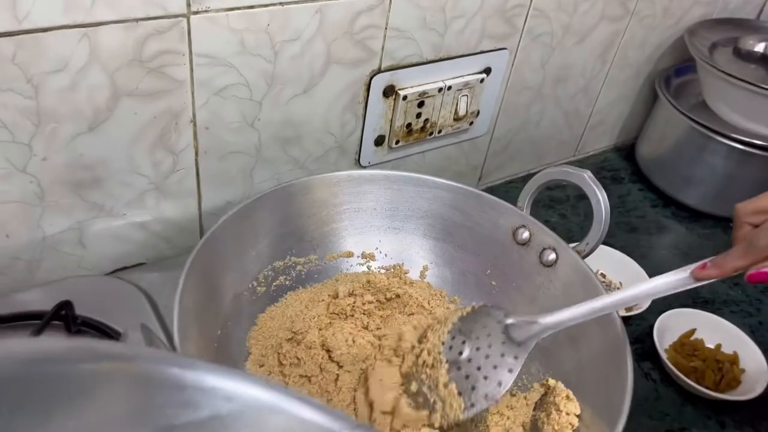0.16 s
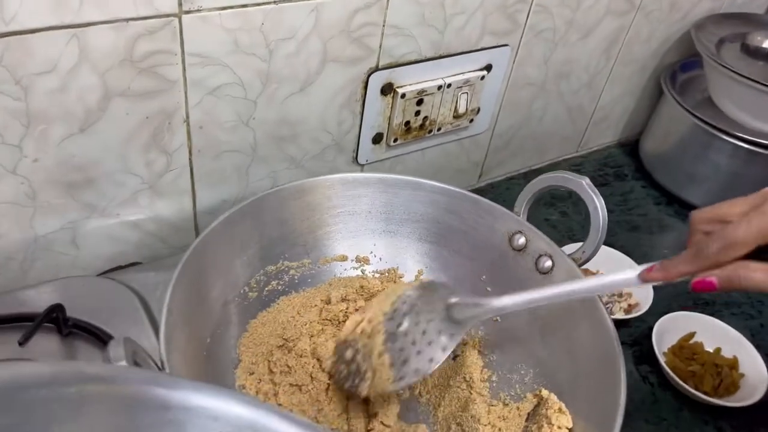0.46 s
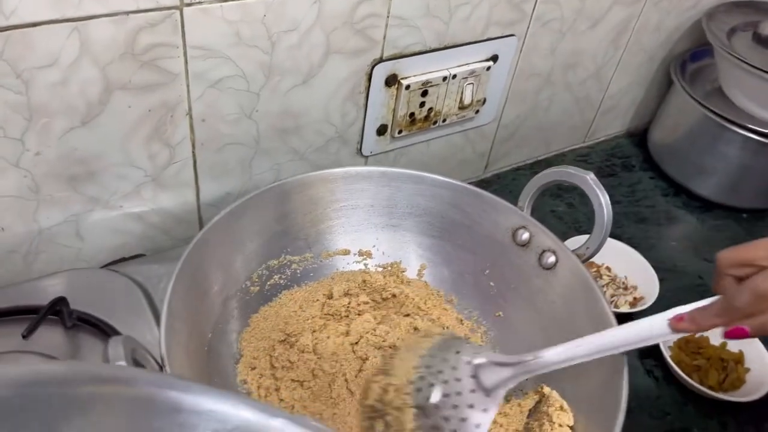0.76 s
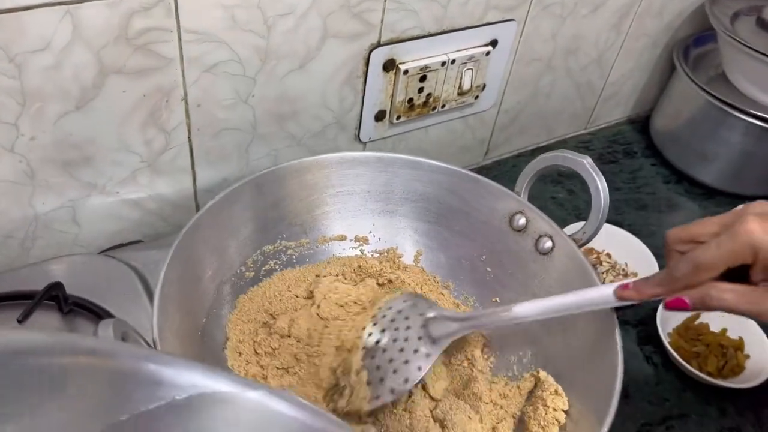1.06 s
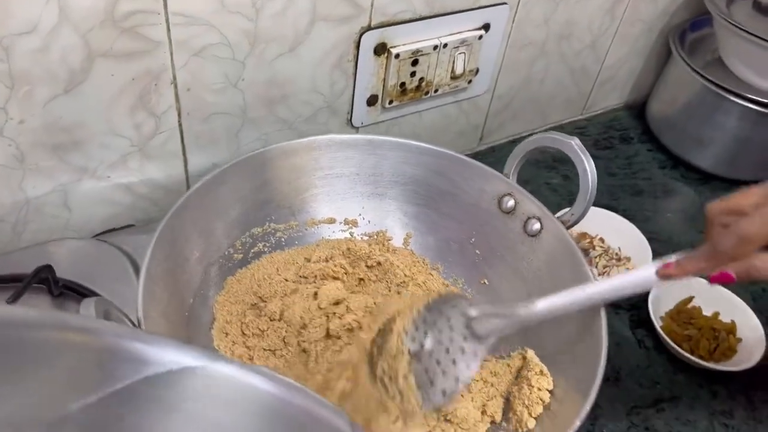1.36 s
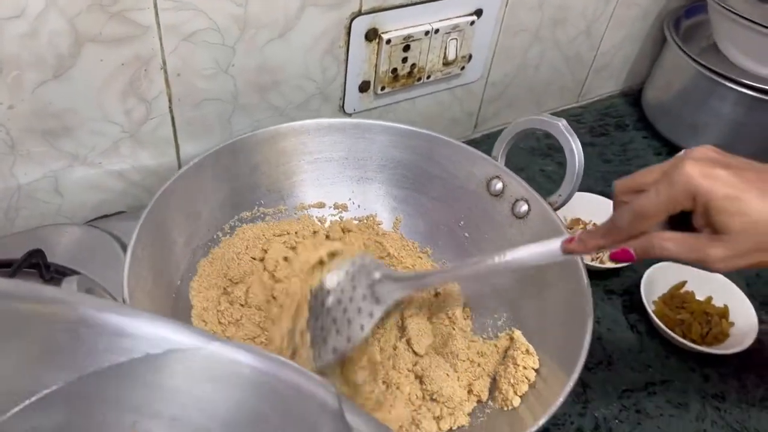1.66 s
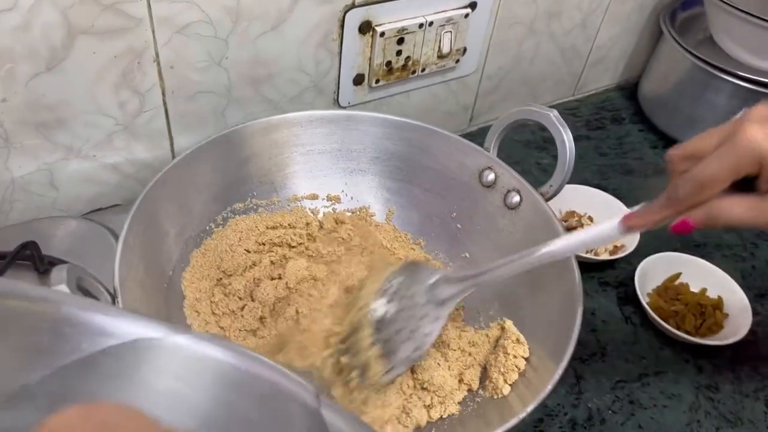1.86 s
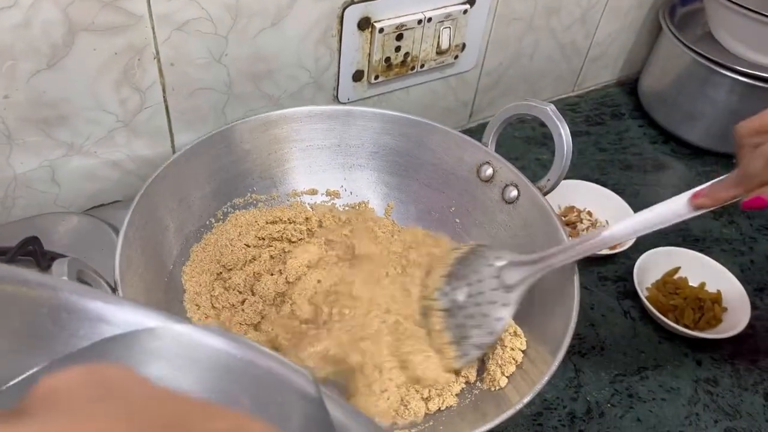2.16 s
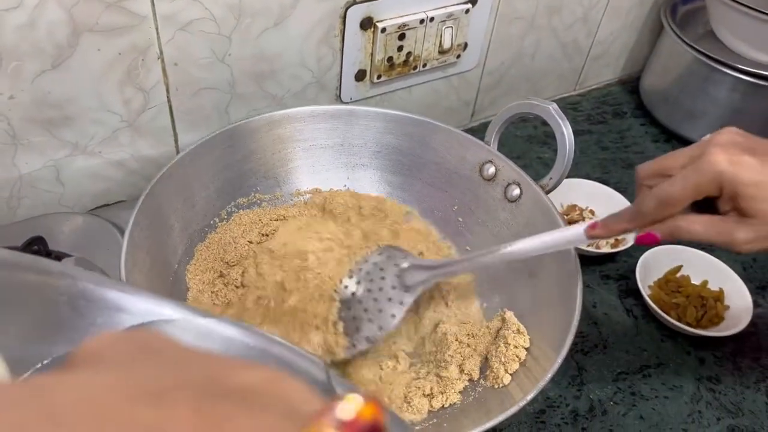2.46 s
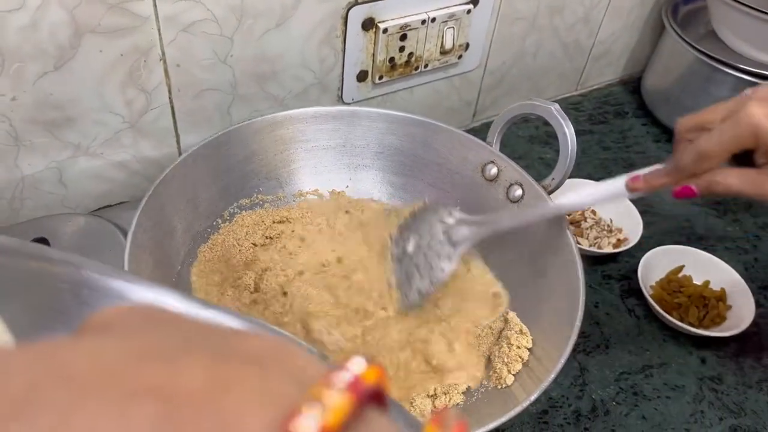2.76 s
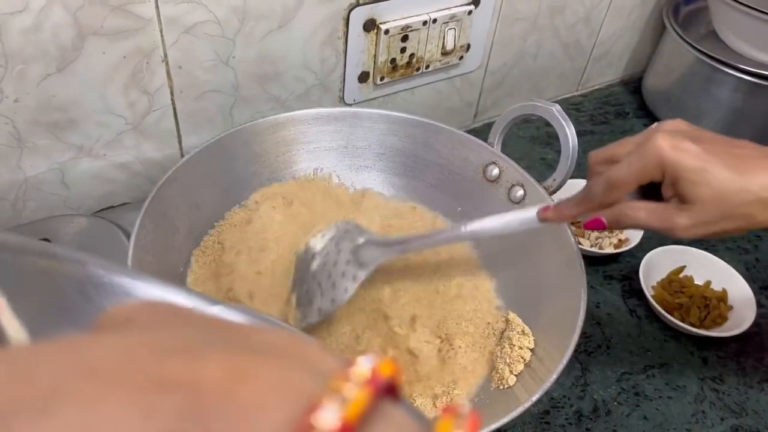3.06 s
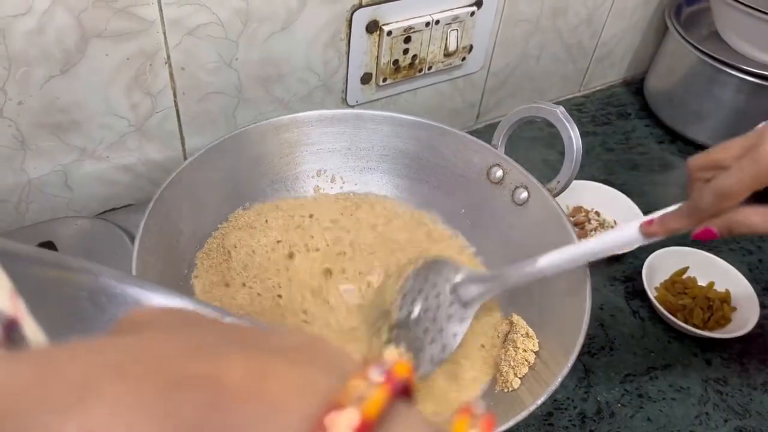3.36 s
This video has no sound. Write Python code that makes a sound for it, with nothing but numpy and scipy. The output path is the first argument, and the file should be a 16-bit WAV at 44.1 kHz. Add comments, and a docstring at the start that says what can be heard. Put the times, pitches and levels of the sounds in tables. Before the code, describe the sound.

Hissing, crackling sizzle of water poured onto hot roasted grain, with soft stirring plops.

```python
"""A tiled kitchen corner, one mono microphone close to a metal wok of roasted semolina and fat.
Hot water is poured in: the first splash flashes into a hiss of tiny bursts, then the full stream boils
with a deeper crackle, which turns hollow and dies down as the grain soaks. A slotted spoon stirs the
paste, which plops as steam escapes. Behind the wok the room hums faintly."""
import sys
import numpy as np
from scipy import signal
from scipy.fft import rfft, irfft
from scipy.io import wavfile
from scipy.ndimage import map_coordinates

SR = 44100
rng = np.random.default_rng(int(sys.argv[2]) if len(sys.argv) > 2 else 0)


def to_wav(sig):
    """Store sig (one row per channel, or 1-D mono) as 16-bit WAV at the path in sys.argv[1].

    Samples outside -1..1 are clipped; the rate is SR.
    """
    pcm = np.clip(np.atleast_2d(sig), -1, 1) * 32767
    pcm = np.round(pcm).astype(np.int16)
    wavfile.write(sys.argv[1], SR, pcm.T)  # frames by channels


N = 154350
T = np.arange(N) / SR
HZ = np.maximum(np.arange(N // 2 + 1) * SR / N, 1)
TOP_HZ = 15600


def undb(db):
    """Decibels to gain."""
    return 10 ** (np.asarray(db) / 20)

def unit(x):
    """Scale to rms 1."""
    return x / np.std(x)

def curve(rows):
    """Gain over time from rows of time_s, level_db."""
    time_s, level_db = np.array(rows).T
    return undb(np.interp(T, time_s, level_db))

def swell(peak_s, spread_s):
    """Bell-shaped rise and fall."""
    return np.exp(-.5 * ((T - peak_s) / spread_s) ** 2)

def shape(rows):
    """Gain per frequency from rows of frequency_hz, gain_db."""
    hz, db = np.array(rows).T
    return undb(np.interp(np.log(HZ), np.log(hz), db))

def peaks(rows, order=2):
    """Gain per frequency of resonances whose powers add."""
    return np.sqrt(sum(undb(db) ** 2 / (1 + ((HZ - hz ** 2 / HZ) / width) ** 2) ** order
                       for hz, width, db in rows))

def colour(x, gain):
    """Filter x and scale it to rms 1."""
    return unit(irfft(rfft(x) * gain, N))

def noise(gain):
    """Filtered noise at rms 1."""
    return colour(rng.standard_normal(N), gain)

def wander(rate_hz):
    """Smooth random drift at rms 1."""
    return noise(1 / (1 + (HZ / rate_hz) ** 4))

def tone(pitch_hz):
    """Sine at rms 1 that follows a moving pitch."""
    return np.sqrt(2) * np.sin(2 * np.pi * np.cumsum(pitch_hz) / SR)

def bursts(per_s, spread_db, steam_db, sputter_db, sputter_hz):
    """Tiny bubbles of random size burst over smooth steam; sputter makes the level waver."""
    size = undb(spread_db * np.minimum(rng.exponential(size=N), 5))
    pops = (rng.random(N) < per_s / SR) * size * rng.choice([-1, 1], N)
    steam = undb(steam_db) * rng.standard_normal(N)
    return (unit(pops) + steam) * undb(sputter_db * wander(sputter_hz))


# Colour of water flashing on hot metal: frequency_hz, gain_db
HISS_SPECTRUM = [(200, -39), (380, -34), (490, -18), (555, -16), (620, -11), (770, -6.5), (850, -27),
                 (940, -20), (1030, -7), (1200, -6), (1320, -9.5), (1850, -9.5), (2030, -1.5), (2300, 0),
                 (2600, -2.5), (3080, -1), (3400, -2.5), (4000, 1.5), (4450, 1), (5100, -3), (5950, -7),
                 (6600, -4), (7400, -8), (8100, -9.5), (8900, -8.5), (9600, -11), (10600, -22),
                 (12500, -34), (14100, -23), (15500, -33)]
# Course of the hiss, before boost_db: time_s, level_db
HISS_ENVELOPE = [(.175, -104), (.2, -53.5), (.265, -42.5), (.43, -43.5), (.47, -46), (.495, -44),
                 (.54, -46.5), (.6, -45.5), (.825, -48.5), (.885, -41), (.94, -36), (1.02, -38),
                 (1.22, -40.5), (1.32, -37), (1.45, -39), (1.6, -39), (1.755, -34), (1.82, -40),
                 (1.9, -42.5), (2.0, -38), (2.25, -46), (2.5, -47.5), (2.66, -51), (2.76, -58), (2.87, -60),
                 (2.925, -46.5), (3.0, -47.5), (3.06, -55.5), (3.27, -57.5), (3.5, -58)]

def hiss(wok, splash_s=.2, body_hz=1900, body_rise_s=.054, boost_db=2):
    """Water flashes to steam, thin at the first splash until the lower body swells in."""
    bubbles = bursts(per_s=9000, spread_db=2, steam_db=-2.5, sputter_db=.5, sputter_hz=90)
    full = colour(bubbles, shape(HISS_SPECTRUM) * wok)
    body = irfft(rfft(full) / (1 + (HZ / body_hz) ** 8), N)
    thinness = np.exp(-np.maximum(T - splash_s, 0) / body_rise_s)
    return (full - body * thinness) * curve(HISS_ENVELOPE) * undb(boost_db)


# Colour of the boiling: frequency_hz, gain_db
BOIL_SPECTRUM = [(150, -65), (280, -27.5), (400, -21.5), (490, -3), (555, -15.5), (620, -1), (900, -0.5),
                 (1120, -3.5), (1550, 2), (1850, -0.5), (2080, 1.5), (2330, -1), (2650, 4), (3050, -3.5),
                 (3400, -10), (3750, -23.5), (4350, -5), (5200, -20), (9000, -41), (15000, -59)]
# Course of the boiling: time_s, level_db
BOIL_ENVELOPE = [(.19, -92), (.3, -58), (.44, -55.5), (.495, -49.5), (.56, -57), (.84, -81), (.95, -43.5),
                 (1.15, -42.5), (1.28, -43), (1.44, -41), (1.55, -37.5), (1.74, -36.5), (1.9, -39),
                 (2.05, -37.5), (2.4, -37), (2.62, -41.5), (2.77, -55), (2.88, -52.5), (2.95, -48.5),
                 (3.08, -55.5), (3.5, -57)]

def boil(wok):
    """The full stream boils in the grain with a deeper crackle."""
    bubbles = bursts(per_s=5000, spread_db=2.5, steam_db=-2, sputter_db=0, sputter_hz=100)
    return colour(bubbles, shape(BOIL_SPECTRUM) * wok) * curve(BOIL_ENVELOPE)


# Colour of the foam: frequency_hz, gain_db
FIZZ_SPECTRUM = [(3000, -46), (3700, -29), (4600, -16), (5400, -6), (6200, -7.5), (6800, -5.5), (7150, 1.5),
                 (7500, -1), (8150, -7), (8750, -2.5), (9200, -2), (9750, -9.5), (10400, -15),
                 (11400, -13.5), (12400, -20), (14000, -16.5), (15500, -29)]
# Course of the foam: time_s, level_db
FIZZ_ENVELOPE = [(.18, -95), (.22, -51), (.3, -47), (.82, -52), (1.0, -53), (1.1, -44.5), (1.6, -47),
                 (1.755, -42), (1.86, -50), (2.03, -43.5), (2.25, -44.5), (2.4, -41), (2.62, -44.5),
                 (2.8, -57.5), (2.93, -44.5), (3.08, -46.5), (3.2, -51.5), (3.29, -56.5), (3.5, -67)]

def fizz(wok):
    """Fine foam bursts high in the treble."""
    bubbles = bursts(per_s=5500, spread_db=3.5, steam_db=4, sputter_db=-1, sputter_hz=78.5)
    return colour(bubbles, shape(FIZZ_SPECTRUM) * wok) * curve(FIZZ_ENVELOPE)


# Resonances of the wok and its tiled corner: pitch_hz, width_hz, gain_db
WOK_MODES = [(599, 14, 7), (653, 24, 2), (762, 18, -1), (786, 16, 2), (824, 12, 1), (941, 16, 2),
             (1038, 34, 1), (1135, 20, -1), (1185, 24, 3), (1351, 16, -1), (1478, 20, -1), (1592, 24, -2),
             (1779, 30, -2), (2052, 54, -5)]
# The wok's faint treble resonances: pitch_hz, width_hz, gain_db
WOK_TREBLE_MODES = [(2740, 60, -6), (3085, 80, -4), (3950, 90, -9), (4280, 70, -7), (4380, 70, -6),
                    (4560, 100, -7), (4790, 100, -8), (8600, 200, -9)]

def wok_response(direct_db=-7):
    """Gain per frequency at the close microphone: direct sound plus the ring of wok and corner."""
    return np.hypot(undb(direct_db), peaks(WOK_MODES + WOK_TREBLE_MODES))


# Course of the hollow's low, high and brightest resonance, each: time_s, level_db
LOW_HOLLOW_ENVELOPE = [(.2, -110), (1.3, -68), (1.7, -49), (1.9, -55), (2.45, -49), (2.58, -53),
                       (2.72, -46.5), (2.77, -52), (2.82, -48.5), (2.89, -55), (2.95, -50), (3.04, -53),
                       (3.09, -68), (3.5, -78)]
HIGH_HOLLOW_ENVELOPE = [(.2, -110), (1.35, -70), (1.765, -40.5), (1.87, -57), (2.05, -44.5), (2.28, -49.5),
                        (2.36, -42), (2.52, -42.5), (2.6, -54), (2.68, -43.5), (2.75, -66), (2.845, -50),
                        (2.88, -59), (2.92, -48), (2.99, -48.5), (3.05, -61), (3.13, -53), (3.25, -65),
                        (3.5, -72)]
BRIGHT_HOLLOW_ENVELOPE = [(.2, -100), (1.9, -58), (2.11, -42.5), (2.27, -61), (2.48, -45.5), (2.65, -52),
                          (2.78, -65), (3.5, -73)]

def stream():
    """The stream rings three broad resonances of the wet hollow that it digs."""
    low = hollow(pitch_hz=1725, width_hz=140) * curve(LOW_HOLLOW_ENVELOPE)
    high = hollow(pitch_hz=2935, width_hz=360) * curve(HIGH_HOLLOW_ENVELOPE)
    bright = hollow(pitch_hz=4420, width_hz=700) * curve(BRIGHT_HOLLOW_ENVELOPE)
    return low + high + bright

def hollow(pitch_hz, width_hz, sag_per_s=.05, on_pitch_s=2.75):
    """Bursts ring one resonance, which sinks through pitch_hz as the paste grows wet."""
    bubbles = bursts(per_s=3300, spread_db=.5, steam_db=-9, sputter_db=.6, sputter_hz=61.6)
    ring = colour(bubbles, peaks([(pitch_hz, width_hz, 0)]))
    speed = np.exp(-sag_per_s * (T - on_pitch_s))
    return map_coordinates(ring, [np.cumsum(speed)], mode="mirror")


# The stream's highest resonances: pitch_hz, width_hz, gain_db
WHISTLE_MODES = [(7370, 900, 3), (9180, 770, -2)]
# Their common course: time_s, level_db
WHISTLE_ENVELOPE = [(.2, -100), (1.2, -62), (1.8, -52.5), (2.3, -48.5), (2.45, -46.5), (2.68, -50.5),
                    (2.8, -51.5), (2.95, -50.5), (3.2, -49), (3.3, -63), (3.5, -69)]

def whistles(waver_db=1.3, waver_hz=9):
    """The stream rings two breathy bands over the wet paste, each wavering on its own."""
    bands = sum(noise(peaks([(hz, width, 0)], order=3)) * undb(db + waver_db * wander(waver_hz))
                for hz, width, db in WHISTLE_MODES)
    return unit(bands) * curve(WHISTLE_ENVELOPE)


def flicker(sizzle, band_count=48, depth_db=1.74, rate_hz=70):
    """Bubbles of each size come and go in their own flurries, so narrow bands waver separately."""
    band_position = (band_count - 1) * np.sqrt(np.minimum(HZ / TOP_HZ, 1))
    spectrum = rfft(sizzle)
    bands = (irfft(spectrum * np.maximum(1 - abs(band_position - k), 0), N) for k in range(band_count))
    return sum(band * undb(depth_db * wander(rate_hz)) for band in bands)


# Water landing on bare hot metal: start_s, level_db
SPIT_EVENTS = [(.489, -41), (0.923, -34), (0.989, -45), (1.025, -47)]
# Colour of a spit: frequency_hz, gain_db
SPIT_SPECTRUM = [(300, -37), (650, -8), (1500, -8), (2200, 4), (3000, -8), (4400, 11), (7000, -8),
                 (15000, -43)]

def spits(decay_s=.024):
    """A splash flashes to steam at once and its crackle dies quickly."""
    bubbles = bursts(per_s=3000, spread_db=1.5, steam_db=1, sputter_db=3, sputter_hz=90)
    envelope = sum(undb(level_db) * (T >= start_s) * np.exp(-abs(T - start_s) / decay_s)
                   for start_s, level_db in SPIT_EVENTS)
    return colour(bubbles, shape(SPIT_SPECTRUM)) * envelope


# Knocks and rubs of the spoon on the wok: peak_s, spread_s, pitch_hz, level_db
SPOON_CONTACTS = [(1.213, 0.014, 1190, -47), (1.248, 0.005, 1180, -41), (1.272, 0.0047, 1210, -41),
                  (1.282, 0.011, 478, -49), (1.287, 0.0073, 1015, -43), (1.355, 0.018, 770, -45.5)]

def spoon(waver_hz=19, rough_db=1.5, rate_hz=70):
    """Each contact of the spoon swells one short note out of the wok, muffled by paste."""
    out = np.zeros(N)
    for peak_s, spread_s, pitch_hz, level_db in SPOON_CONTACTS:
        note = tone(pitch_hz + waver_hz * wander(rate_hz))
        out += note * undb(level_db + rough_db * wander(rate_hz)) * swell(peak_s, spread_s)
    return out


# Plops of the stirred paste: peak_s, spread_s, thud_db, ring_db
PLOP_EVENTS = [(0.97, 0.023, -66, -46), (1.286, 0.012, -55, -55), (1.503, 0.017, -70, -45),
               (1.818, 0.034, -62, -54), (2.024, 0.019, -59, -46), (2.398, 0.052, -58, -48.5),
               (2.57, 0.081, -76, -47), (2.7, 0.011, -72, -47.5), (2.751, 0.013, -67, -51),
               (2.8, 0.016, -53.5, -43), (2.862, 0.023, -61.5, -49), (3.03, .012, -60, -44.5),
               (3.124, 0.046, -58, -56), (3.189, 0.014, -54, -44.5), (3.222, 0.0095, -54, -50),
               (3.468, 0.026, -59, -64)]
# Colour of the thud: frequency_hz, gain_db
THUD_SPECTRUM = [(120, -33), (240, -7), (330, 6.5), (480, 1), (560, 0.5), (900, -6.5), (2000, -34),
                 (8000, -46)]

def plops(ring_hz=650, waver_hz=14, rough_db=2):
    """Pockets of steam leave the paste: a soft thud and a swell of the wok's low ring."""
    thud = noise(shape(THUD_SPECTRUM))
    ring = tone(ring_hz + waver_hz * wander(rate_hz=60)) * undb(rough_db * wander(rate_hz=70))
    return sum(swell(peak_s, spread_s) * (undb(thud_db) * thud + undb(ring_db) * ring)
               for peak_s, spread_s, thud_db, ring_db in PLOP_EVENTS)


# Colour of the spoon in dry grain: frequency_hz, gain_db
SCRAPE_SPECTRUM = [(150, -14), (400, 5), (650, 3.5), (1000, -11), (1550, -17), (1900, 0), (2200, -6),
                   (2600, 6.5), (3200, -9), (4400, -5), (6000, -14), (9000, -11), (11000, -36),
                   (15000, -40)]

def scrape(level_db=-62.5, hold_s=.03, fall_db_per_s=307):
    """Before the pour, the spoon ends a stroke through the dry grain: an even rasp that dies away."""
    rasp = noise(shape(SCRAPE_SPECTRUM))
    return rasp * undb(level_db - fall_db_per_s * np.maximum(T - hold_s, 0))


# Dull low bumps under the cooking: peak_s, level_db
BUMP_EVENTS = [(1.155, -60), (1.65, -67.5), (1.91, -65), (2.705, -63)]

def bumps(pitch_hz=52, width_hz=70, spread_s=.018):
    """A few brief swells of deep noise."""
    boom = noise(peaks([(pitch_hz, width_hz, 0)]))
    return boom * sum(undb(level_db) * swell(peak_s, spread_s) for peak_s, level_db in BUMP_EVENTS)


# Colour of the kitchen's air and of its rumble, each: frequency_hz, gain_db
AIR_SPECTRUM = [(20, -23), (100, 13), (190, 5), (240, 0.5), (320, 13.5), (600, 6.5), (900, -3), (1500, -8),
                (2200, -20), (4500, -32), (9000, -23), (15000, -37)]
RUMBLE_SPECTRUM = [(8, -7.5), (20, 2.5), (32, -12), (48, -15.5), (70, -22), (200, -22), (1000, -86)]
# Tones of the room's hum, once fully risen: pitch_hz, level_db
HUM_TONES = [(101, -79), (150, -83), (183, -76.5)]

def room_tone(air_db=-71.5, rumble_db=-64, waver_db=1.5, waver_hz=4, opening_db=-7, rise_s=1.0):
    """Air, rumble and a wavering hum behind the wok rise at the opening, then hold."""
    air = noise(shape(AIR_SPECTRUM)) * undb(air_db)
    rumble = noise(shape(RUMBLE_SPECTRUM)) * undb(rumble_db)
    hum = np.zeros(N)
    for pitch_hz, level_db in HUM_TONES:
        gain = undb(level_db + waver_db * wander(waver_hz))
        hum += gain * np.sqrt(2) * np.sin(2 * np.pi * (pitch_hz * T + rng.random()))
    return (air + rumble + hum) * curve([(0, opening_db), (rise_s, 0)])


def scene():
    """Wok and kitchen reach one close microphone, alike in both channels."""
    wok = wok_response()
    sizzle = flicker(hiss(wok) + boil(wok) + fizz(wok) + stream() + whistles())
    mono = sizzle + spits() + scrape() + spoon() + plops() + room_tone() + bumps()
    return np.array([mono, mono])

def record(dry):
    """The recorder cuts the treble steeply above TOP_HZ."""
    return signal.sosfilt(signal.ellip(10, .2, 80, TOP_HZ, fs=SR, output="sos"), dry)


dry = scene()
out = record(dry)
to_wav(out)
```